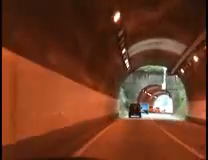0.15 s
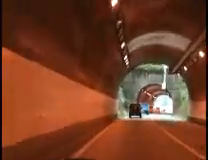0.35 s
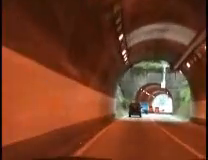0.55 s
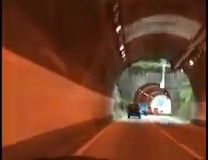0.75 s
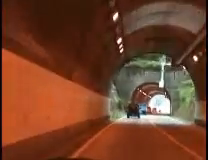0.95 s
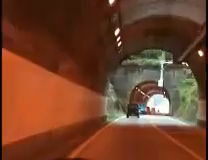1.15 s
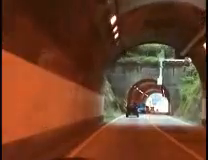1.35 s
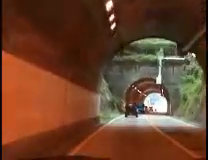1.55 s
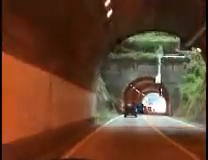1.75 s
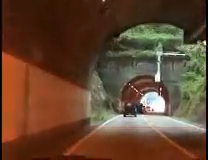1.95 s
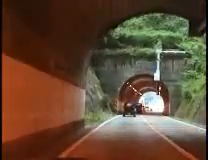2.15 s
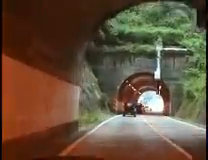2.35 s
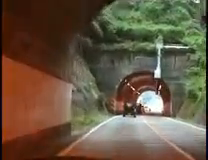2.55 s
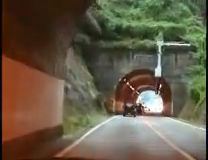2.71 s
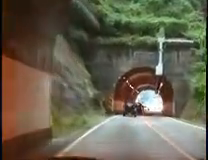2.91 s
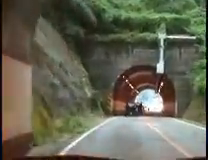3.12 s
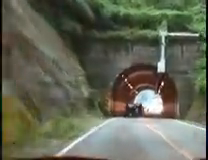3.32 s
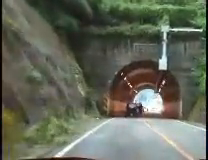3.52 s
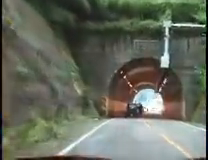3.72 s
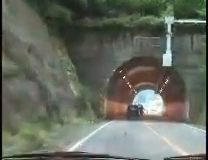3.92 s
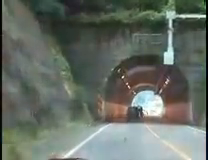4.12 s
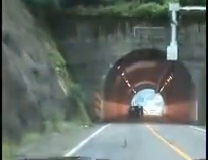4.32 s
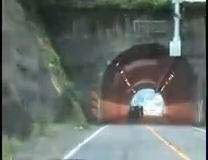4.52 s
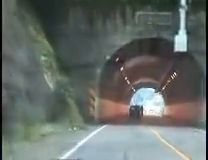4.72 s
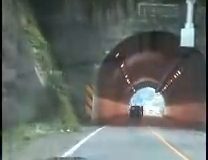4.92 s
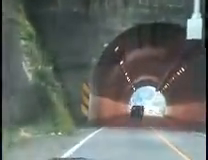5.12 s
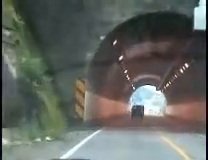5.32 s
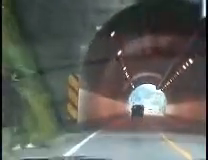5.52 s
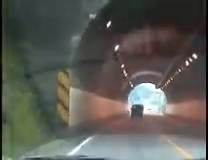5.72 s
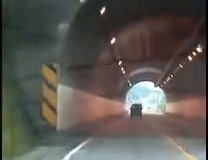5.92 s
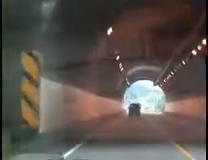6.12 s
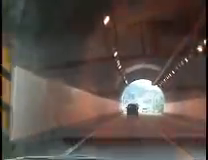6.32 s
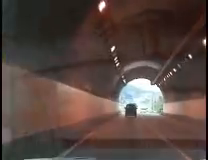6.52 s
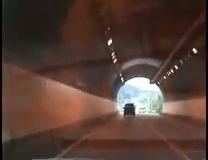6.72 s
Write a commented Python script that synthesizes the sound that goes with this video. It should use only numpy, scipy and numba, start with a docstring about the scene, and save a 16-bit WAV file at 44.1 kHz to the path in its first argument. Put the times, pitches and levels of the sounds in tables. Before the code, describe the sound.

Low droning road noise heard from a car cabin between tunnels, thinning in the open, with light crackly rustle and a short rattle midway.

```python
"""Inside a car at steady speed: it leaves one tunnel after four seconds and nears the next at the end.
Road noise rings resonances of suspension, floor panel, cabin air and tyres; walls and road patches set their level.
Tyre roar and wind through the glass are shaped noise, with less left-right likeness at some pitches.
Something light rustles close by: crackles over hiss. A small metal piece ticks: chatter through its modes.
The trim knocks briefly: damped noise bursts through one broad resonance each."""
import sys
import numpy as np
from scipy import signal
from scipy.fft import rfft, irfft
from scipy.io import wavfile
from scipy.ndimage import uniform_filter1d, map_coordinates
from numba import njit

SR = 44100
rng = np.random.default_rng(int(sys.argv[2]) if len(sys.argv) > 2 else 0)


def generate_wav(signal):
    """Clip the signal to [-1, 1] and save it as 16-bit WAV at the path in sys.argv[1]."""
    frames = np.transpose(np.atleast_2d(signal))
    scaled = np.clip(frames, -1, 1) * 32767
    pcm = np.round(scaled).astype(np.int16)
    wavfile.write(sys.argv[1], SR, pcm)


N = 297807


def undb(db):
    """Amplitude factor of a level in dB."""
    return 10 ** (np.asarray(db) / 20)


def unit(x):
    """Scale to rms 1."""
    return x / np.sqrt(np.mean(np.abs(x) ** 2))


def curves(table):
    """Columns of a time table, interpolated at every sample."""
    t_s, *columns = np.transpose(table)
    return [np.interp(np.arange(N) / SR, t_s, column) for column in columns]


def over_hz(table, hz):
    """A (f/Hz, value) table read on a log-frequency axis."""
    f_hz, value = np.transpose(table)
    return np.interp(np.log(hz + 1), np.log(f_hz), value)


def walk(rate_hz):
    """Random levels, one per 1 / rate_hz, slewed twice; spread near 1."""
    hold = int(SR / rate_hz)
    steps = np.repeat(rng.standard_normal(N // hold + 1), hold)
    return 1.7 * uniform_filter1d(uniform_filter1d(steps, hold), hold)[:N]


def resonate(x, hz, width_hz):
    """Complex one-pole resonance applied twice, so its skirts fall steeply."""
    pole = np.exp((2j * np.pi * hz - np.pi * width_hz) / SR)
    return signal.lfilter([1], [1, -2 * pole, pole ** 2], x + 0j)


# resonances of each group: [f/Hz, pole width/Hz, level/dB, left minus right/dB, left leads/rad]
SUSPENSION_MODES = [(20.34, 4.8, -2.5, 0.5, 0.54), (36.5, 15, -3, -3, 0.65), (53.15, 9.9, -1, 1.5, 0.41),
                    (67.55, 14, -1.5, 0, 1)]
PANEL_MODES = [(81, 36.5, -5, 3.7, 0.94), (98.34, 20.7, 3, 1.8, 0.61)]
CABIN_MODES = [(125.14, 13, -5.5, -1.5, 0.91), (145.6, 16.7, -0.5, -0.5, 0.59), (167, 19.3, -13, 5, 0.36)]
TYRE_MODES = [(184.9, 21, -3, 5, -0.48), (211.1, 23.4, -6, -5.5, 0.94), (239.2, 32.4, -8, 0, 0.74),
              (261.2, 13.1, 1.5, -0.5, 0.43), (297.96, 45, -5, -4.5, 0.41), (341.3, 23.6, -8.5, 2, -1.46)]
# power share that differs left to right: [suspension, floor panel, cabin air, tyre]
APART_SHARE = (.02, .04, .06, .2)
STEADINESS = .3  # 0 as uneven as noise, higher is steadier
WANDER_SHARE, WANDER_DB, WANDER_PER_S = .018, 1.5, 5  # drift of each mode's pitch and strength


def rumble(modes, apart):
    """Road roughness rings each mode; left and right sit at different points of the mode's shape."""
    out, side = 0, np.array([[.5], [-.5]])
    for hz, width_hz, db, pan_db, lead_rad in modes:
        both, left, right = (unit(resonate(rng.standard_normal(N + SR), hz, width_hz)) for _ in range(3))
        # even out the swings: a steadier drone than plain noise
        both = unit(both / (np.abs(both) ** 2 + .7) ** (STEADINESS / 2))
        both = unit(resonate(both, hz, 4 * width_hz))

        # pad the drift over the one-second run-up
        pitch, strength = np.pad([walk(WANDER_PER_S), walk(WANDER_PER_S)], ((0, 0), (SR, 0)))
        phase_rad = 2 * np.pi * np.cumsum(WANDER_SHARE * hz * pitch) / SR
        both = both * np.exp(1j * phase_rad) * undb(WANDER_DB * strength)

        shared = np.sqrt(1 - apart) * both * np.exp(1j * lead_rad * side)
        ring = shared + np.sqrt(apart) * np.array([left, right])
        # drop the run-up: already ringing at the start
        out = out + undb(db + pan_db * side) * np.sqrt(width_hz) * ring.real[:, SR:]
    return out / np.sqrt(np.mean(out.mean(axis=0) ** 2))


# group levels between walls, and their change in the open: [suspension, floor panel, cabin air, tyre], all /dB
WALLED_DB = (-30, -29.5, -28, -31)
OPEN_CHANGE_DB = (-1, -2.5, -7.5, -3)
# how closely walls surround the car, also read by the roar: [t/s, enclosure 0-1]
ENCLOSURE = [(0, 0.87), (3.8, 0.77), (4.35, 0.11), (5.5, 0.05), (6.1, 0), (6.75, 0.8)]
# rougher and smoother road: [t/s, half length/s, suspension/dB, floor panel/dB, cabin air/dB, tyre/dB]
ROAD_PATCHES = [(0.089, 0.2, 7, 5, 4.5, 1), (0.791, 0.058, -4, 5.5, 6, 4), (1.299, 0.18, -7, 2, 4, 0.1),
                (1.913, 0.065, -1.5, 0, -4, 5), (2.289, 0.2, -1.5, 3.5, 8, 2.5),
                (2.64, 0.069, 0, -6, -8, 5.5), (2.822, 0.16, -2.5, 1, 5, -1), (3.043, 0.23, 5.5, 4.5, 5, 2),
                (3.695, 0.27, -0.5, 1, 7, 1.6), (4.477, 0.13, -3, -15.5, -4, -0.5),
                (4.597, 0.045, -18, -13, 1.5, 4), (4.817, 0.14, 4, 1, -1, -2.5),
                (5.605, 0.18, -2, -2.5, -2.5, 1.5), (5.83, 0.091, -3, -9, -8, -1.5),
                (6.027, 0.19, 1.5, 2.5, 5, 1), (6.167, 0.11, 2.5, -4.5, -2.3, 5.5)]


def road_db():
    """Level of each resonance group: walls set it, bell-shaped patches of road lift or dip it."""
    t, (walls,) = np.arange(N) / SR, curves(ENCLOSURE)
    db = np.array(WALLED_DB)[:, None] + np.array(OPEN_CHANGE_DB)[:, None] * (1 - walls)
    for t_s, half_s, *patch_db in ROAD_PATCHES:
        bell = np.exp(-((t - t_s) / half_s) ** 2)
        db = db + np.array(patch_db)[:, None] * bell
    return db


# relative spectrum of tyre roar and wind: [f/Hz, level per Hz/dB]
ROAR_SPECTRUM = [(150, 7.5), (330, 1.5), (400, -1.5), (500, -6), (570, -5.5), (650, -5), (760, -7.5),
                 (1000, -8.5), (1500, -14.5), (2000, -20.5), (2600, -30), (3600, -35.5), (6000, -70.5)]
# left-right likeness of the roar: [f/Hz, shared power 0-1]
ROAR_LIKENESS = [(300, 0.66), (560, 0.61), (1000, 0.6), (1300, 0.38), (1800, 0.48), (2500, 0.62),
                 (4000, .95)]
# phase of the shared roar: [f/Hz, left leads/rad]
ROAR_PHASE = [(300, 0.21), (900, 0.78), (1400, 0.36), (1900, .05)]
ROAR_OPEN_TILT_DB = 1  # per octave above 800 Hz: brighter away from the walls


def roar(flicker_db=0.6, swell_db=0.15, flutter_db=0.8):
    """Tyre roar and wind: noise whose octave bands swell and flutter together and flicker alone."""
    hz = np.fft.rfftfreq(N, 1 / SR)
    alike = over_hz(ROAR_LIKENESS, hz)
    both, left, right = rfft(rng.standard_normal((3, N)))
    turn = np.exp(.5j * over_hz(ROAR_PHASE, hz))
    shared = np.sqrt(alike) * both * np.array([turn, 1 / turn])
    pair = shared + np.sqrt(1 - alike) * np.array([left, right])
    pair = pair * undb(over_hz(ROAR_SPECTRUM, hz)) * (hz > 100)

    out, together_db = 0, swell_db * walk(2.4) + flutter_db * walk(45)
    walls, = curves(ENCLOSURE)
    for k in range(8):
        band = np.clip(1 - np.abs(np.log2(hz / 100 + 1e-9) - k), 0, 1)
        tilt_db = ROAR_OPEN_TILT_DB * max(k - 3, 0) * (1 - walls)
        out = out + irfft(pair * band, N) * undb(tilt_db + together_db + flicker_db * walk(25.15))

    # rms 1 in the mono core, 450-1800 Hz
    core = irfft(rfft(out.mean(axis=0)) * (hz > 450) * (hz < 1800), N)
    return out / np.sqrt(np.mean(core ** 2))


# roar through the glass: [t/s, level of the 450-1800 Hz core/dB]
ROAR_LEVELS = [(0, -38.5), (.6, -40.5), (2.05, -40), (2.8, -42), (3.6, -43), (4.7, -44.5), (5.6, -44),
               (6.1, -44.5), (6.75, -43)]


def roar_gain():
    """Slow level curve of the roar."""
    level_db, = curves(ROAR_LEVELS)
    return undb(level_db)


def patchy(x, depth_db=5, wide_hz=100, long_s=.04):
    """Narrow bands swell and fade on their own, so the hiss is uneven and gritty."""
    hz, t, z = signal.stft(x, SR, nperseg=512)
    chance = rng.standard_normal((128, 512))
    where = np.meshgrid(hz / wide_hz, t / long_s, indexing="ij")
    field = map_coordinates(chance, where, order=1, mode="wrap")
    return signal.istft(z * undb(depth_db * np.tanh(field)), SR, nperseg=512)[1][:N]


# relative rustle spectrum: [f/Hz, level per Hz/dB]
RUSTLE_SPECTRUM = [(1200, 4.5), (2200, 9.5), (3500, 6.5), (5000, 5.5), (7000, 0), (8600, -4)]
# stereo width of the rustle: [f/Hz, side minus mid/dB]
RUSTLE_WIDTH = [(1500, 1.5), (2500, -13), (3500, -26), (8000, -26)]


def rustle(per_s=500, scatter_db=2.5, hiss=1.0, flicker_db=0.4):
    """Tiny crackles of uneven size over a soft hiss; each half octave crackles on its own."""
    hz = np.fft.rfftfreq(N, 1 / SR)
    stir, mid = walk(25), 0
    for k in range(7):
        busy = rng.random(N) < per_s * undb(2.5 * stir) / SR
        size_db = scatter_db * np.minimum(rng.exponential(size=N), 3)
        grains = busy * undb(size_db) * np.sign(rng.standard_normal(N))
        x = (unit(grains) + hiss * rng.standard_normal(N)) * undb(flicker_db * walk(12))
        band = np.clip(1 - np.abs(2 * np.log2(hz / 1100 + 1e-9) - k), 0, 1) ** .5
        mid = mid + rfft(unit(x)) * band
    mid = rfft(patchy(irfft(mid, N)))
    side = undb(over_hz(RUSTLE_WIDTH, hz)) * rfft(rng.standard_normal(N))
    pair = np.array([mid + side, mid - side])
    return unit(irfft(pair * undb(over_hz(RUSTLE_SPECTRUM, hz)) * (hz > 600), N))


# swells of the rustle: [peak t/s, fall time/s, peak level/dB]
RUSTLE_SWELLS = [(.31, 0.081, -53.5), (.45, 0.32, -56), (.63, 0.15, -57.5), (.77, 0.16, -54.5),
                 (1.04, 0.089, -53.5), (1.29, 0.032, -56.5), (1.46, 0.074, -57.5), (1.86, 0.097, -52.5),
                 (2.03, 0.098, -57.5), (2.45, 0.046, -60), (3.06, 0.09, -58), (3.404, 0.12, -50.5),
                 (4.0, 0.019, -57), (4.22, 0.07, -53), (4.35, 0.16, -49.5), (4.53, 0.082, -51.5),
                 (4.85, 0.047, -59), (5.05, 0.18, -59), (5.3, 0.061, -58), (5.45, 0.091, -57),
                 (5.59, 0.071, -51.5), (5.73, 0.069, -53), (6.23, 0.071, -58.5), (6.46, 0.088, -56)]
RUSTLE_FLOOR_DB = -59.5  # between swells
RUSTLE_RISE = 0.78  # rise time over fall time


def rustle_gain():
    """Each swell rises and falls as a bell over a steady floor; powers add."""
    t, power = np.arange(N) / SR, undb(RUSTLE_FLOOR_DB) ** 2
    for t_s, fall_s, db in RUSTLE_SWELLS:
        half_s = np.where(t < t_s, RUSTLE_RISE * fall_s, fall_s)
        power = power + undb(db) ** 2 * np.exp(-2 * ((t - t_s) / half_s) ** 2)
    return np.sqrt(power)


# metal ticks: [t/s, peak level/dB, brightness/dB per octave, favoured f/Hz]
METAL_TICKS = [(.607, -50, -15, 3290), (0.8215, -43.5, 5, 4870), (1.04, -49, -5, 4870),
               (1.966, -44.5, 0, 4840), (2.769, -43.5, 4, 4000), (3.63, -47, -15, 3320),
               (4.264, -43.5, 9, 4000), (4.334, -40, 0, 4870), (4.4, -45, 0, 5400), (4.4494, -48, 9, 6670),
               (4.596, -49.5, 6, 7490), (4.771, -55, -12, 2900), (4.8225, -35.5, 0, 7500),
               (4.845, -48, -4, 5400), (5.297, -49, 0, 4900), (5.451, -46, 5, 4000), (5.594, -49, 1, 7490),
               (6.218, -47, -5, 4870), (6.281, -52, 11, 8100), (6.419, -42, 4, 4870)]
# modes of the metal piece: [f/Hz, pole width/Hz, level/dB]
METAL_MODES = [(2090, 120, -4), (2930, 200, -4), (3300, 160, -3), (4000, 200, -5), (4870, 130, -1),
               (5220, 140, -4), (5410, 130, -3), (5900, 250, -9), (6670, 170, -10), (7160, 170, -6),
               (7500, 130, -1), (7780, 250, -3), (8100, 220, -9)]
TICK_SCATTER_DB = 1.5  # mode strength, tick to tick
FAVOUR_DB, FAVOUR_OCTAVES = 8, .06  # lift of the modes nearest the favoured one


def ticks(crack_db=-1, rise_s=.0006, chatter_s=0.0065):
    """Each tick is a few ms of chatter that rings the same metal modes with new strengths."""
    out, t = np.zeros(N), np.arange(int(.06 * SR)) / SR
    scatter = rng.standard_normal((len(METAL_TICKS), len(METAL_MODES)))
    noise = rng.standard_normal((len(METAL_TICKS), len(t)))
    for (t_s, db, tilt_db, favoured_hz), row, chatter in zip(METAL_TICKS, scatter, noise):
        chatter = chatter * (1 - np.exp(-t / rise_s)) * np.exp(-t / chatter_s)
        ring = undb(crack_db) * unit(np.gradient(chatter))  # direct crack
        for (hz, width_hz, mode_db), chance in zip(METAL_MODES, row):
            favour_db = FAVOUR_DB * np.exp(-(np.log2(hz / favoured_hz) / FAVOUR_OCTAVES) ** 2)
            gain_db = mode_db + TICK_SCATTER_DB * chance + tilt_db * np.log2(hz / 5000) + favour_db
            ring = ring + undb(gain_db) * unit(resonate(chatter, hz, width_hz).real)
        i = int(t_s * SR)
        out[i:i + len(t)] += undb(db) * ring / np.abs(ring).max()
    return out


# dull knocks of the trim: [t/s, peak level/dB, centre f/Hz, left minus right/dB]
TRIM_KNOCKS = [(4.203, -37, 1600, 1), (4.2384, -40, 1800, 1), (4.2786, -35, 1300, -4),
               (4.2945, -31, 1900, 2), (4.333, -33, 1900, 1), (4.3685, -36, 1500, 3),
               (4.377, -33.5, 1900, 3), (4.403, -38, 1400, 0), (4.421, -39, 1100, 0),
               (4.459, -35.5, 1700, -1), (4.541, -39, 1400, 0)]


def knocks(decay_s=0.0065, width=1.0):
    """Decaying noise bursts through one broad resonance each; width is a share of its centre."""
    out, t = np.zeros((2, N)), np.arange(int(0.12 * SR)) / SR
    bursts = rng.standard_normal((len(TRIM_KNOCKS), len(t)))
    for (t_s, db, hz, pan_db), noise in zip(TRIM_KNOCKS, bursts):
        burst = resonate(noise * np.exp(-t / decay_s), hz, width * hz).real
        side_db = np.array([[pan_db], [-pan_db]]) / 2
        i = int(t_s * SR)
        out[:, i:i + len(t)] += undb(db + side_db) * burst / np.abs(burst).max()
    return out


def scene():
    """Rumble, roar, rustle, ticks and knocks."""
    groups = zip(road_db(), (SUSPENSION_MODES, PANEL_MODES, CABIN_MODES, TYRE_MODES), APART_SHARE)
    body = sum(undb(db) * rumble(modes, apart) for db, modes, apart in groups)
    return body + roar_gain() * roar() + rustle_gain() * rustle() + ticks() + knocks()


@njit
def follow(x, attack, release):
    """Peak follower: rises fast, falls slowly; rates are shares per sample."""
    out, level = np.empty(len(x)), 0.
    for i in range(len(x)):
        level += (x[i] - level) * (attack if x[i] > level else release)
        out[i] = level
    return out


LIMIT_DB, LIMIT_RATIO, ATTACK_S, RELEASE_S = -17, 3, 0.001, 0.02
TOP_HZ = 8590


def record(dry):
    """A limiter on the mono envelope holds down the peaks; the top is cut steeply."""
    envelope = np.abs(signal.hilbert(dry.mean(axis=0)))
    peak = follow(envelope, 1 / (ATTACK_S * SR), 1 / (RELEASE_S * SR))
    gain = np.minimum(undb(LIMIT_DB) / (peak + 1e-9), 1) ** (1 - 1 / LIMIT_RATIO)
    top_cut = signal.ellip(12, .2, 80, TOP_HZ, fs=SR, output="sos")
    return signal.sosfilt(top_cut, dry * gain)


dry = scene()
out = record(dry)
generate_wav(out)
```